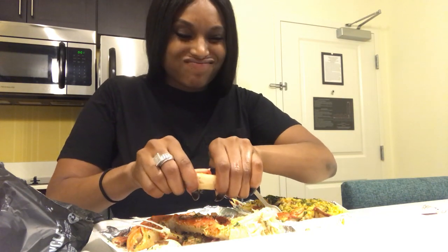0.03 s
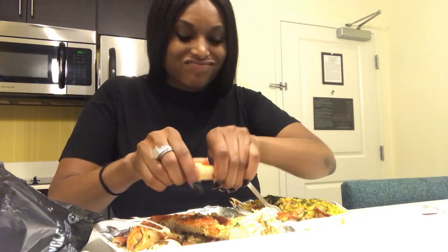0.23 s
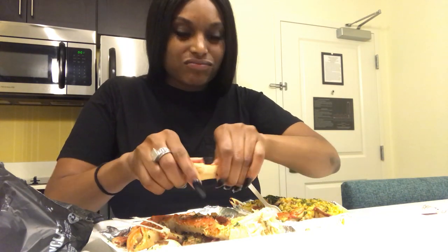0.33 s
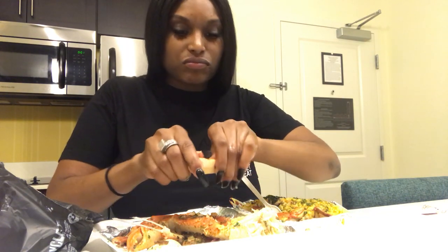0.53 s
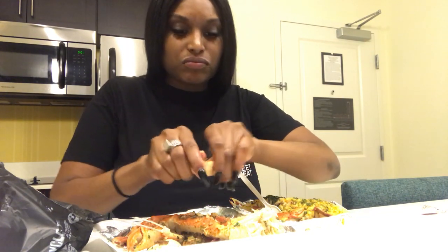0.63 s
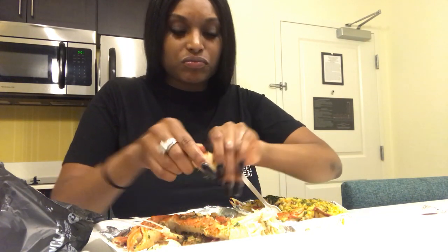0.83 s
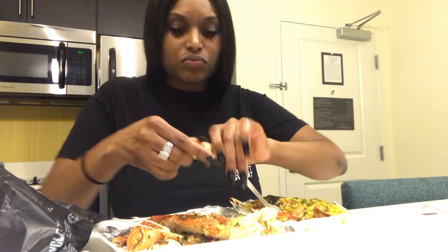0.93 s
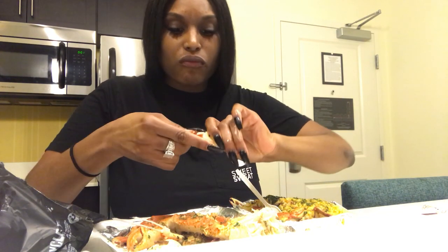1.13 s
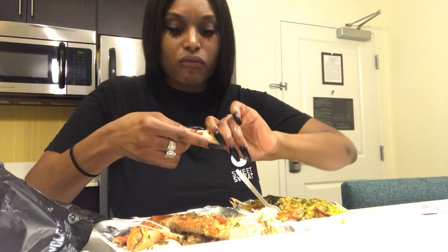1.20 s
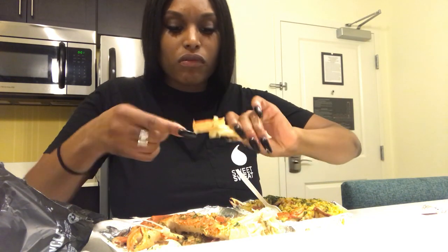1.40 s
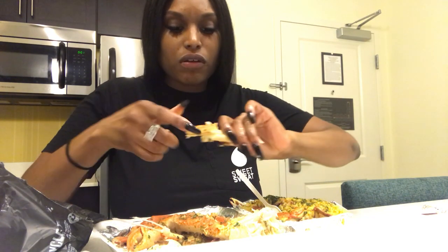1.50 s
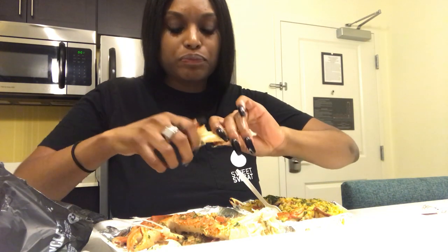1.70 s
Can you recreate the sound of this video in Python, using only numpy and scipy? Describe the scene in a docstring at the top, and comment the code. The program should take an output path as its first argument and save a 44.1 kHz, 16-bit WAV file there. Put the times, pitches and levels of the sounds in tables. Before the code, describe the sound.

Close, dry cracking of a hollow crab shell: a hard bright snap first, then splintering and tearing in short clusters as the halves are pulled apart, with soft finger rubbing, short room reverberation and low appliance hum.

```python
"""Small kitchen: a crab leg is broken by hand at a table.
The hollow shell snaps loudly in two close steps: splintering bursts excite wall modes and a cavity ring.
Small cracks follow, mostly in three runs, as the halves are twisted and pulled apart; each has its own pitches.
Two clicks come near the end. Random grains make the tearing; filtered noise makes rubbing and ventilation.
The room adds two echoes and a noise tail; an appliance hums behind as wavering sines."""
import sys
import numpy as np
from scipy import signal
from scipy.fft import rfft, irfft, next_fast_len
from scipy.io import wavfile

SR = 44100
rng = np.random.default_rng(int(sys.argv[2]) if len(sys.argv) > 2 else 0)


def store_pcm(level_fs):
    """Save levels as 16-bit WAV."""
    pcm = np.round(np.clip(level_fs, -1, 1) * 32767).astype(np.int16)
    wavfile.write(sys.argv[1], SR, np.atleast_2d(pcm).T)


N = 77175
T = np.arange(N) / SR

# ventilation noise and faint hiss, colours: f/Hz, relative level/dB
AIR_COLOUR = [(25, -33.5), (50, 2.5), (85, 0), (110, -4), (170, -4), (260, -7), (400, -7.5), (520, -20.5),
              (700, -20), (1000, -14), (1300, -18), (1800, -36.5), (3000, -48.5)]
HISS_COLOUR = [(500, -8), (1500, -1), (3000, -3), (8000, -7), (16000, -10)]
AIR_RMS_DB, HISS_RMS_DB = -64.5, -77
# appliance tones: f/Hz, nominal rms level/dB
HUM_TONES = [(73.4, -62.5), (910, -82), (1102, -79)]
HUM_WAVER, HUM_WANDER_RAD = 0.05, 0.3
HUM_WAVER_RATE_HZ, HUM_WANDER_RATE_HZ = 4, 6.86

# fingers sliding on the shell, envelope: t/s, level/dB
RUB_LEVEL = [(.2, -69.5), (.38, -63.5), (.54, -61.5), (.64, -69), (.78, -64.5), (.9, -71.5), (1.3, -71.5),
             (1.55, -70), (1.75, -73)]
# friction colour: f/Hz, relative level/dB
RUB_COLOUR = [(100, -2.5), (350, 8.5), (700, 2.5), (1300, 1.5), (2500, -2.5), (6000, -4.5), (10000, -10.5),
              (15000, -11)]

# fibres tearing and fingers rubbing, crackle envelope: t/s, level/dB
TEAR_LEVEL = [(0, -96.5), (.12, -93), (.2, -58), (.42, -66), (.55, -88), (.64, -101), (.70, -85),
              (.77, -47.5), (.86, -82), (.92, -64), (.98, -48.5), (1.12, -63), (1.24, -78), (1.30, -71),
              (1.345, -50), (1.41, -65), (1.52, -79), (1.75, -100)]
GRAINS_PER_S, GRAIN_SPREAD_DB, TEAR_RING_HZ, TEAR_RING_DB = 2500, 4.5, 2660, -9

# small cracks: t/s, relative level/dB, nominal splinter decay/s, cavity f/Hz, cavity ring/dB,
# wall f/Hz, wall ring/dB, body/dB, treble/dB
CRACKS = [(.163, -47.5, 0.00076, 2530, 1, 7200, -4, 8, 0),
          (.349, -33, 0.0011, 2580, -5, 6100, -8, -13, 3.5),
          (.572, -36.5, 0.0012, 2500, 1, 5500, -23, 4, 7.5),
          (0.583, -31, 0.0013, 2600, -10, 5860, -19, 8, 2),
          (0.5934, -32.5, 0.003, 2580, 3, 5900, -11, 5, 1), (.654, -54, 0.0012, 2640, 2, 6000, -9, 6, -8),
          (0.6723, -43.5, 0.00088, 2820, -20, 7950, 5.5, 7, 2),
          (.677, -38.5, 0.0017, 2670, 1.5, 8100, -17, -12, 4),
          (0.7134, -39, 0.00067, 2780, -18, 8300, -5, 10, 4),
          (.719, -34, 0.0028, 2730, 2, 8150, -3, -16, 8), (0.721, -24, 0.0046, 2600, -7.5, 8000, -8, 8, 1),
          (0.7296, -30, 0.00074, 2780, -1, 8100, -5, -14, -2),
          (0.7386, -33.5, 0.0025, 2860, -1, 6000, -1, 4, 2),
          (.742, -31.5, 0.0011, 2700, -1, 8200, -7, 4, 2),
          (0.7623, -20, 0.0014, 2480, 0.5, 5100, -1.5, 3, 2),
          (0.7634, -29.5, 0.00067, 2640, 4, 5870, -8, 6.5, -16),
          (0.773, -33.5, 0.0022, 2600, -27, 5130, 4.5, 7, 2),
          (.776, -38, 0.0013, 2800, -27, 6100, 9, -6, 16),
          (0.7828, -33.5, 0.00087, 3100, -9, 4800, 6, -20, 13),
          (.787, -33.5, 0.00042, 2340, -16, 4440, 6, -4, -1),
          (.798, -28.5, 0.0011, 2970, 3, 6000, -5, -6, 6),
          (0.8297, -28.5, 0.0008, 2600, -1, 5900, -9, -6, 2.5),
          (.935, -26, 0.00084, 2850, 8, 4830, 1.5, -7, 9.5),
          (0.9488, -19, 0.00044, 2530, -24, 5100, -25, -22, -4.5),
          (.9528, -31, .0008, 3250, 5, 9500, -5, 6, 5), (0.9558, -26.5, 0.0011, 2920, 6, 5170, -5, -3, 7),
          (0.9767, -23.5, .0015, 2660, 0, 5500, -21, -9, -2),
          (.983, -20, 0.0016, 2280, -8, 5000, -9, -14, 2.5),
          (0.9901, -25, 0.0015, 2490, -12, 8900, -22, 5, 0),
          (.9975, -24.5, 0.001, 2300, -11, 5300, -8, -1, 7),
          (1.005, -41, 0.0009, 2640, 2, 5500, -8, -6, 11), (1.012, -34, 0.0012, 2800, 4, 5500, -8, 8, 6),
          (1.026, -35, 0.0032, 2680, 1, 9380, -6, 11, 6), (1.0376, -33.5, 0.0021, 3000, 3, 5500, -22, 4, 7),
          (1.048, -30.5, 0.002, 2400, -7, 5470, -18, 6, 9),
          (1.059, -30, 0.00092, 2700, -3, 5360, -16, 5, 7), (1.067, -42.5, .001, 2820, 11, 5500, -19, 6, 8),
          (1.107, -39.5, 0.0022, 2800, 2, 5500, -27, 10, 12.5),
          (1.167, -44.5, 0.00086, 3040, -2, 8000, 3.5, -2, 12),
          (1.231, -52, .0006, 3020, -12, 6940, 0, 0, 14), (1.272, -46.5, 0.00082, 3040, 3, 7000, -21, 8, 9),
          (1.3015, -46, 0.00083, 3000, -12, 5500, -6, -18, 11),
          (1.3094, -24.5, 0.006, 3320, -6.5, 4750, -12, -28, 7.5),
          (1.323, -39, 0.0019, 3070, -14, 9300, 1, -9, 10),
          (1.330, -25, 0.0063, 3050, -9, 9500, -9, -6, 7.5),
          (1.338, -35, 0.0017, 3030, -20, 9300, -11, -5, -2),
          (1.3444, -26.5, 0.0017, 3200, -16, 9400, -1, 5, 6.5),
          (1.3842, -30.5, 0.0015, 3150, -0.5, 6000, -7, -11, 4),
          (1.408, -41, 0.0011, 3220, -17, 5940, 0, 4, 13),
          (1.642, -47.5, 0.00086, 3200, -10, 7500, -9, -10, 10)]
# tick colour of cracks and tearing: f/Hz, relative level/dB
CRACK_COLOUR = [(150, -29), (500, -17.5), (1000, -4), (1700, -3), (2300, 2), (3800, 3.5), (5500, 1),
                (8000, -3.5), (11500, -2.5), (15000, 0.5)]
CRACKS_TRIM_DB, CRACK_SPLINTER_DB = 0.5, 8
CRACK_RING_WIDTH_HZ, WALL_WIDTH_HZ = 1090, 1900
# body gain is full below the first, gone above the second; treble gain the reverse
BODY_HZ, BODY_TOP_HZ = 1440, 2240
TREBLE_FROM_HZ, TREBLE_TO_HZ = 3540, 9450

# two-step break: t/s, level/dB, nominal splinter decay/s, cavity ring/dB
SNAP_STEPS = [(.1857, 4, 0.00063, -6), (0.1876, -9.5, 0.0014, -0.5)]
# colour of the break: f/Hz, relative level/dB
SNAP_COLOUR = [(100, -25), (360, -16.5), (560, -14), (790, -18), (1000, -16.5), (1450, -1), (1800, -12),
               (2100, -9), (3200, 0), (4200, 3), (6500, 2.5), (10500, -3), (15000, -3.5)]
# shell wall: f/Hz, width/Hz, relative level/dB
WALL_MODES = [(4380, 190, -5), (4520, 270, -0.5), (5670, 130, -6.5), (6560, 220, -4), (6985, 220, 10.5),
              (7770, 150, -11.5), (10000, 380, -6), (12400, 150, 9), (14100, 660, -2), (15170, 320, -7)]
# broad cavity ring: f/Hz, relative level/dB
CAVITY_COLOUR = [(1000, -32), (1450, -14), (1820, -28), (2060, -1), (2550, 0), (2750, -9), (2950, -7),
                 (3600, -16), (6000, -30)]
# dull knock of the leg in the hands: f/Hz, width/Hz, relative level/dB
THUMP_MODES = [(230, 99, -2.5), (360, 130, 2), (840, 97, 0)]
SNAP_SPLINTER_DB, WALL_DB, THUMP_DB = 4, -8.5, -17
CAVITY_LAG_S, THUMP_LAG_S = 0.0009, 0.00292
FRACTURE_SAMPLES = 1024
SPLINTER_EVENNESS = 0.55  # 0-1: how evenly a fracture drives all frequencies

# nearby surfaces: delay/s, level/dB
ECHOES = [(.0033, -23.5), (.0072, -20.5)]
# room decay: f/Hz, t60/s
ROOM_T60 = [(250, 0.24), (1200, 0.33), (2500, 0.2845), (5000, 0.3155), (9000, 0.29), (15000, 0.23)]
# room colour on cracks, clicks and tearing: f/Hz, relative level/dB
ROOM_COLOUR = [(200, -3), (800, -4), (1400, 1), (1780, -3), (2080, 2), (2700, 2.5), (4000, 0), (8000, 0),
               (12000, -2), (15500, -3)]
# snap radiation all round, into the room: f/Hz, relative level/dB
SNAP_SPREAD_COLOUR = [(150, -17), (330, -14), (550, -18), (900, -15), (1450, -5.5), (1800, -14), (2070, 3),
                      (2550, 3), (2750, -1.5), (3400, -4), (4300, -3.5), (7000, -3.5), (9500, -5),
                      (12000, -7), (15500, -5)]
ROOM_DELAY_S, CRACK_ROOM_DB, SNAP_SPREAD_DB = 0.0049, -7, -0.5

# last strands part: t/s, level/dB, ring f/Hz, ring/dB, treble/dB
CLICKS = [(1.4211, -25, 3670, 0.5, -6), (1.4263, -23, 4170, -3, 6)]
# click colour: f/Hz, relative level/dB
CLICK_COLOUR = [(300, -34), (1500, -8), (2600, -7), (4000, -2), (6500, 0), (9300, -6.5), (12500, -12),
                (15500, -24)]
CLICK_SPLINTER_S, CLICK_SPLINTER_DB, CLICK_RING_WIDTH_HZ = 0.0016, 0.5, 1060

MIC_LOW_CUT_HZ, CUTOFF_HZ = 33, 15800


def from_db(db):
    """Decibels to amplitude gain."""
    return 10 ** (np.asarray(db) / 20)


def unit(x):
    """Scale to energy 1."""
    return x / np.sqrt(np.sum(x ** 2) + 1e-20)


def unit_rms(x):
    """Scale a full-length signal to rms 1."""
    return np.sqrt(N) * unit(x)


def envelope(points):
    """Gain over time, interpolated linearly in dB."""
    return from_db(np.interp(T, *np.transpose(points)))


def at_hz(points, hz):
    """Read a table on a log-frequency axis."""
    f, v = np.transpose(points)
    return np.interp(np.log(np.maximum(hz, 1)), np.log(f), v)


def coloured(x, points):
    """Causal minimum-phase filter, built by folding the cepstrum of the given spectrum."""
    n = next_fast_len(2 * len(x))
    gain = from_db(at_hz(points, np.fft.rfftfreq(n, 1 / SR)))
    cepstrum = irfft(np.log(gain), n)
    cepstrum[1:n // 2] *= 2
    cepstrum[n // 2:] = 0
    response = np.exp(rfft(cepstrum))
    return irfft(rfft(x, n) * response, n)[:len(x)]


def resonance(x, hz, width_hz):
    """Two-pole resonance with gain about 1 at its peak."""
    r = np.exp(-np.pi * width_hz / SR)
    zeros = np.array([1, 0, -1]) * (1 - r * r) / 2
    poles = [1, -2 * r * np.cos(2 * np.pi * hz / SR), r * r]
    return signal.lfilter(zeros, poles, x + 1e-18)


def modes(force, table):
    """Resonances side by side, in alternating sign; energy 1."""
    return unit(sum((-1) ** k * from_db(db) * resonance(force, hz, width_hz)
                    for k, (hz, width_hz, db) in enumerate(table)))


def drift(rate_hz):
    """Slow random curve: normal knots at the given rate, joined by lines."""
    return np.interp(T * rate_hz, np.arange(200), rng.standard_normal(200))


def add(out, s, x):
    """Mix a short sound in at time s."""
    i = int(s * SR)
    out[i:i + len(x)] += x[:N - i]


def fracture(decay_s, splinter_db):
    """Sudden release plus a dying burst of splintering, its spectrum partly evened out; energy 1."""
    decay = np.exp(-T[:FRACTURE_SAMPLES] / max(decay_s, 1 / SR))
    splinters = unit(rng.standard_normal(FRACTURE_SAMPLES) * decay)
    force = from_db(splinter_db) * splinters
    force[0] += 1
    # each pass flattens the spectrum, then cuts back to length
    for _ in range(4):
        spectrum = rfft(force, 2 * FRACTURE_SAMPLES)
        flatter = spectrum / (np.abs(spectrum) + 1e-9) ** (SPLINTER_EVENNESS / 2)
        force = irfft(flatter)[:FRACTURE_SAMPLES]
    return unit(force)


def shell(force, colour, ring_hz, width_hz, ring_db, treble_db=0):
    """The shell radiates a broad tick and the ring of its cavity, a resonance applied twice."""
    tick = unit(coloured(force, colour))
    tick = coloured(tick, [(TREBLE_FROM_HZ, 0), (TREBLE_TO_HZ, treble_db)])
    ring = resonance(resonance(force, ring_hz, width_hz), ring_hz, width_hz)
    return tick + from_db(ring_db) * unit(ring)


def ventilation():
    """Steady broadband noise: low-heavy air plus faint hiss."""
    air = unit_rms(coloured(rng.standard_normal(N), AIR_COLOUR))
    hiss = unit_rms(coloured(rng.standard_normal(N), HISS_COLOUR))
    return from_db(AIR_RMS_DB) * air + from_db(HISS_RMS_DB) * hiss


def appliance_hum():
    """Sine tones, each wavering in level and wandering in phase on its own."""
    hum = np.zeros(N)
    for hz, rms_db in HUM_TONES:
        level = from_db(rms_db) * np.sqrt(2) * (1 + HUM_WAVER * drift(HUM_WAVER_RATE_HZ))
        phase = 2 * np.pi * hz * T + HUM_WANDER_RAD * drift(HUM_WANDER_RATE_HZ)
        hum += level * np.sin(phase)
    return hum


def rubbing():
    """Soft friction of the fingers as they shift their grip: coloured noise under an envelope."""
    return unit_rms(coloured(rng.standard_normal(N), RUB_COLOUR)) * envelope(RUB_LEVEL)


def tearing():
    """Tiny random fractures of mixed size and sign excite the shell under an envelope."""
    size_db = GRAIN_SPREAD_DB * np.minimum(rng.exponential(1, N), 5)
    sizes = from_db(size_db) * rng.choice([-1, 1], N)
    grains = sizes * (rng.random(N) < GRAINS_PER_S / SR)
    crackle = shell(grains, CRACK_COLOUR, TEAR_RING_HZ, CRACK_RING_WIDTH_HZ, TEAR_RING_DB)
    return unit_rms(crackle) * envelope(TEAR_LEVEL)


def cracks():
    """Small pieces crack off: each fracture drives a tick, a cavity ring and a wall ring."""
    out = np.zeros(N)
    for s, db, decay_s, cavity_hz, ring_db, wall_hz, wall_db, body_db, treble_db in CRACKS:
        force = fracture(decay_s, CRACK_SPLINTER_DB)
        piece = shell(force, CRACK_COLOUR, cavity_hz, CRACK_RING_WIDTH_HZ, ring_db, treble_db)
        piece += from_db(wall_db) * unit(resonance(force, wall_hz, WALL_WIDTH_HZ))
        piece = coloured(piece, [(BODY_HZ, body_db), (BODY_TOP_HZ, 0)])
        add(out, s, from_db(db + CRACKS_TRIM_DB) * piece)
    return out


def snap():
    """The whole leg breaks: the wall rings at once, the cavity just after, and the halves knock in the hands."""
    out = np.zeros(N)
    for s, db, decay_s, ring_db in SNAP_STEPS:
        force = fracture(decay_s, SNAP_SPLINTER_DB)
        wall = from_db(WALL_DB) * modes(force, WALL_MODES)
        add(out, s, from_db(db) * (unit(coloured(force, SNAP_COLOUR)) + wall))
        cavity = unit(coloured(force, CAVITY_COLOUR))
        add(out, s + CAVITY_LAG_S, from_db(db + ring_db) * cavity)
    thump = modes(signal.unit_impulse(FRACTURE_SAMPLES), THUMP_MODES)
    add(out, SNAP_STEPS[0][0] + THUMP_LAG_S, from_db(THUMP_DB) * thump)
    return out


def snap_spread():
    """All-round radiation of the snap: one coloured impulse that only drives the room tail."""
    out = np.zeros(N)
    pulse = unit(coloured(signal.unit_impulse(FRACTURE_SAMPLES), SNAP_SPREAD_COLOUR))
    add(out, SNAP_STEPS[0][0], from_db(SNAP_SPREAD_DB) * pulse)
    return out


def early_echoes(direct):
    """Nearby surfaces return delayed, weaker copies."""
    return sum(from_db(db) * np.interp(T - s, T, direct, left=0) for s, db in ECHOES)


def room_response():
    """Diffuse tail: noise in overlapping bands, each with its own decay; energy 1."""
    white = rfft(rng.standard_normal(N))
    hz = np.fft.rfftfreq(N, 1 / SR)
    centres_hz, t60s = np.transpose(ROOM_T60)
    tail = np.zeros(N)
    # band weights crossfade between centres and sum to 1
    for t60_s, share in zip(t60s, np.eye(len(t60s))):
        weight = at_hz(list(zip(centres_hz, share)), hz)
        tail += irfft(white * weight, N) * from_db(-60 * T / t60_s)
    return unit(tail * (T > ROOM_DELAY_S))


def clicks():
    """Clicks as the halves come free, ringing higher than the cracks' cavity."""
    out = np.zeros(N)
    for s, db, ring_hz, ring_db, treble_db in CLICKS:
        force = fracture(CLICK_SPLINTER_S, CLICK_SPLINTER_DB)
        click = shell(force, CLICK_COLOUR, ring_hz, CLICK_RING_WIDTH_HZ, ring_db, treble_db)
        add(out, s, from_db(db) * click)
    return out


def scene():
    """The shell close by, with early echoes, room tail, rubbing and background."""
    small = cracks() + clicks() + tearing()
    direct = snap() + small
    into_room = from_db(CRACK_ROOM_DB) * coloured(small, ROOM_COLOUR) + snap_spread()
    tail = signal.fftconvolve(into_room, room_response())[:N]
    return (direct + early_echoes(direct) + tail + rubbing() + ventilation() + appliance_hum())[None]


def record(dry):
    """The microphone drops the deepest bass; the top is cut steeply."""
    low_cut = signal.butter(2, MIC_LOW_CUT_HZ, "high", fs=SR, output="sos")
    top_cut = signal.ellip(10, 0.1, 80, CUTOFF_HZ, fs=SR, output="sos")
    return signal.sosfilt(top_cut, signal.sosfilt(low_cut, dry))


dry = scene()
out = record(dry)
store_pcm(out)
```